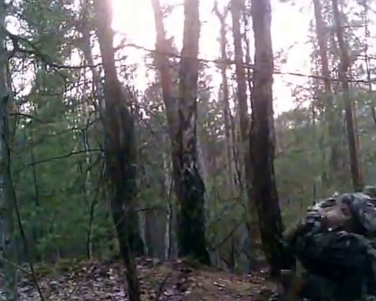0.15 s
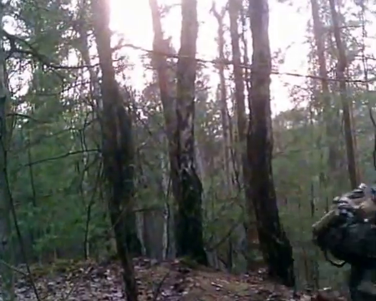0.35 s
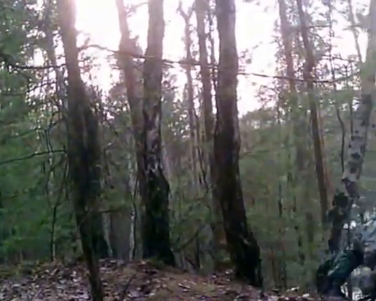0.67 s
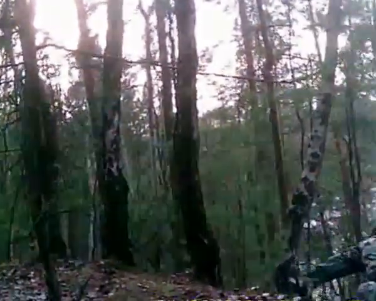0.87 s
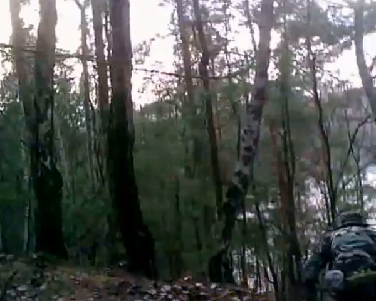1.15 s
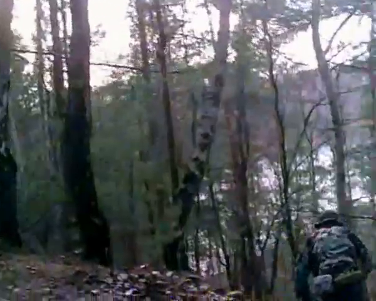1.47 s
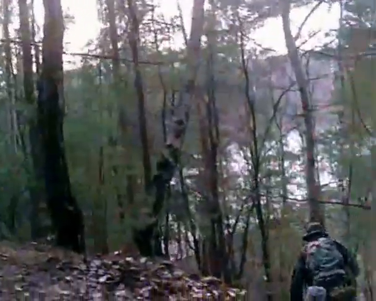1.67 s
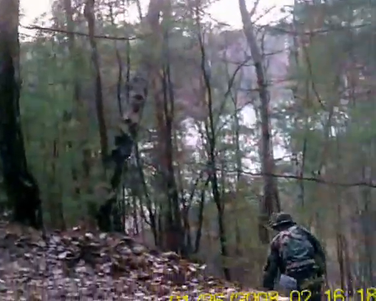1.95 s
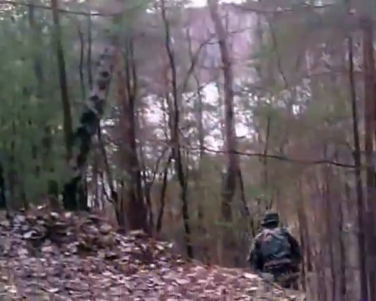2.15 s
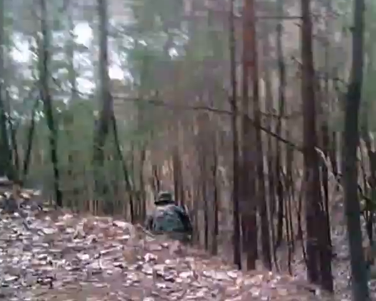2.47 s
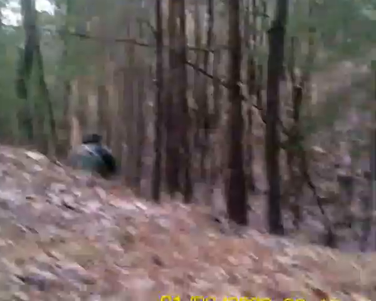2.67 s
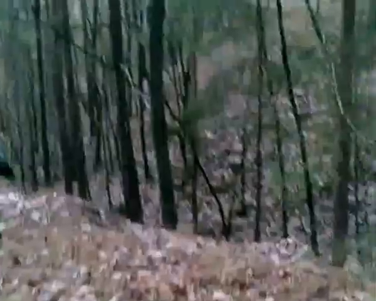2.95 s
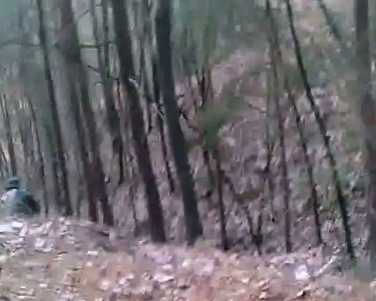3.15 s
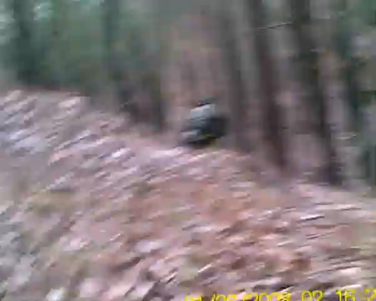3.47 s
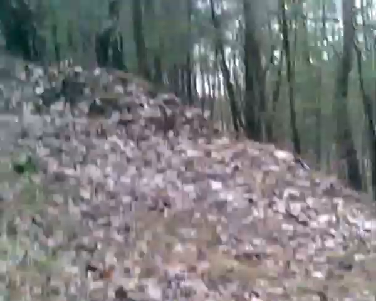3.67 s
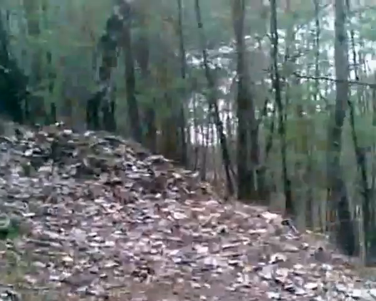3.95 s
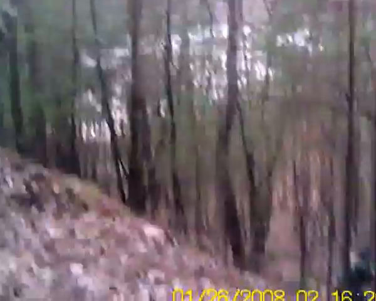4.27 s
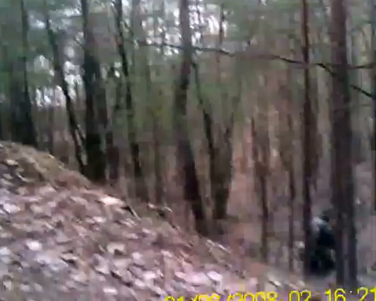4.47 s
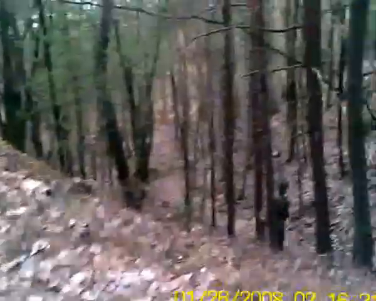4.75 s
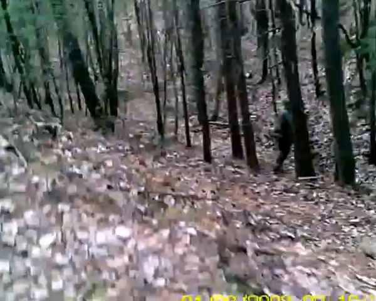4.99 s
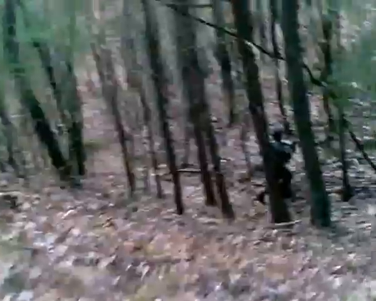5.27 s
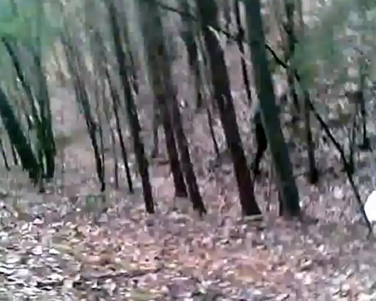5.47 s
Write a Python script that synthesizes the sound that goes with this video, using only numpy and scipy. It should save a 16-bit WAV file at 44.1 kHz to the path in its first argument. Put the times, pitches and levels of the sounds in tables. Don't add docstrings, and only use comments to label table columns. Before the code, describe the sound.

Outdoors among dry fallen leaves, a handful of faint rustling steps from others fade in the first second and a half, under rumbling wind and cloth friction. A buckle clicks near the microphone. Then the wearer sets off, crushing leaves irregularly, snapping twigs and stiff leaves, while gear thumps the camera case and wind gusts swell. Close, rough mono pickup with hiss, faint electronic whine and a hollow colouring.

```python
import sys
import numpy as np
from scipy import signal
from scipy.fft import rfft, irfft
from scipy.io import wavfile
from scipy.ndimage import uniform_filter1d

SR = 44100
rng = np.random.default_rng(int(sys.argv[2]) if len(sys.argv) > 2 else 0)


def volts(x):
    e = np.asarray(x, float) / 20
    return 10 ** e


def output_pcm(signal):
    pcm = np.clip(np.atleast_2d(signal).T, -1, 1) * 32767
    wavfile.write(sys.argv[1], SR, np.round(pcm).astype(np.int16))


N = 247842
T = np.arange(N) / SR

# start_s, buffet_level_db (slow pushes), flutter_level_db (quick ones)
WIND = [(0, -33, -41), (.25, -39, -42.5), (.9, -32, -40.5), (1.1, -35.5, -44), (1.5, -32, -43.5),
        (1.9, -35.5, -48), (2.24, -22.5, -35.5), (2.46, -28, -42.5), (2.83, -22, -41.5), (3.61, -27.5, -48),
        (3.72, -23.5, -35.5), (3.95, -28.5, -39.5), (4.22, -21.5, -37.5), (4.3, -32.5, -31),
        (4.37, -24, -26), (4.62, -22, -22.5), (5.24, -28, -44.5), (5.62, -29.5, -32)]
# pitch_hz, level_db
BUFFET_COLOUR = [(1, 8), (3, 5), (8, 11.5), (16, 3), (30, 6), (45, -0.5), (70, -27.5), (120, -44)]
# pitch_hz, level_db
FLUTTER_COLOUR = [(25, -60), (45, -3), (65, -1.5), (90, -5), (130, -10), (180, -21.5), (300, -29.5),
                  (600, -56)]
# start_s, length_s, level_db
PUFFS = [(2.05, 0.089, -43), (2.17, 0.12, -32), (2.64, 0.061, -41.5), (2.82, 0.086, -48),
         (3.02, 0.051, -29.5), (3.46, 0.043, -32.5), (3.68, 0.054, -33.5), (3.8, 0.078, -30),
         (4.22, 0.057, -30), (4.33, 0.034, -23), (4.77, 0.034, -25), (5.1, 0.037, -41)]

# start_s, length_s, level_db
RUBS = [(.2, 0.18, -47.5), (.6, 0.17, -45.5), (.89, 0.068, -49.5), (1.08, 0.55, -46), (1.62, 0.48, -48.5),
        (2.04, 0.42, -45), (2.36, 0.35, -41), (2.75, 0.21, -42), (3.15, 0.12, -45.5), (3.27, 0.098, -41),
        (3.41, 0.099, -39.5), (3.47, 0.2, -46), (3.8, 0.17, -44.5), (3.98, 0.083, -41), (4.12, 0.35, -45),
        (4.64, 1, -43.5), (5.08, 0.13, -38.5), (5.34, 0.051, -61), (5.54, 0.15, -42)]
# pitch_hz, level_db
RUB_COLOUR = [(100, 0), (180, 0), (300, -1), (450, -1), (650, -9.5), (850, -17.5), (1050, -23.5),
              (1400, -52)]

# start_s, level_db
LITTER = [
    (0, -63.5),
    (2.2, -60),
    (2.5, -55),
    (4.4, -58.5),
    (5.62, -58.5),
]
# start_s, length_s, level_db, body_db, brightness_db
SHUFFLES = [(.0, 0.046, -61, -7, -2), (1.117, 0.5, -55.5, 7, -14), (1.6, 0.24, -57.5, 6, -5),
            (1.947, 0.36, -54.5, 6.5, -6), (2.86, 0.15, -40.5, -1.5, -6), (3.402, 0.2, -47, 3.5, -7.5),
            (3.787, 0.33, -47.5, 3.5, -2), (4.023, 0.28, -51.5, 8, 2), (4.574, 0.21, -52, 8, -2),
            (4.8, 0.19, -50, 10, -6.5), (5.51, 0.088, -48, 1, -2)]
# start_s, length_s, level_db, body_db, brightness_db
FAR_STEPS = [
    (0.158, 0.25, -53, -0.5, 0),
    (0.53, 0.29, -50, -4, -0.5),
    (0.892, .08, -55.5, -14, -6),
    (1.102, 0.11, -62, 0, -7),
    (1.36, 0.38, -55, 2, 0.5),
]
# start_s, length_s, level_db, body_db, brightness_db
STEPS = [(2.346, .3, -42, 2, -4.5), (2.56, .14, -52, 6, 0.5), (2.794, 0.064, -49.5, -6, -10),
         (3.11, 0.085, -50, -5, -6.5), (3.265, 0.036, -50.5, 3.5, -8.5), (3.38, 0.088, -54.5, 6.5, -5),
         (3.655, 0.1, -56, 7, -3), (3.757, 0.14, -49, 1.5, -5.5), (4.258, .15, -57.5, 4, 0.5),
         (4.476, 0.089, -51.5, -8, -3.5), (4.794, 0.074, -48, 4, -7), (4.96, 0.13, -45.5, 8, -0.5),
         (5.083, 0.16, -45, 7.5, -3), (5.356, 0.055, -52, 1, -5.5), (5.445, 0.028, -51, 1.5, -2)]

# start_s, peak_db, body_db
TWIGS = [(0.3334, -41.5, 5.5), (0.3723, -46, 7), (.917, -38.5, -12), (1.534, -56, -15), (2.377, -38, 0),
         (2.394, -35, -7), (2.4957, -35, -1), (2.8943, -38, 2.5), (3.1453, -31.5, -14), (3.247, -34, -6),
         (3.2774, -47, -10), (3.3353, -38.5, 2), (3.4634, -52, -21), (3.6019, -38, 1), (3.7893, -35, -13),
         (3.9251, -31, -2), (3.935, -38, -16), (3.9656, -32, -13), (3.9933, -33, -6), (4.013, -34.5, -2),
         (4.091, -28, -13), (4.4929, -30, -8.5), (4.751, -37.5, -5), (4.8095, -30, -6),
         (4.9414, -44.5, 11.5), (4.9743, -40, 10), (5.461, -35, -15), (5.477, -33, -20)]
# start_s, peak_db, body_db
CRISP = [(.173, -43, -21), (0.6354, -40, -12), (1.393, -43, -1), (2.5894, -34.5, -1), (2.709, -39, -7),
         (3.375, -35.5, -18), (3.4011, -30.5, -4), (3.6605, -36, 0), (3.691, -32.5, -6), (3.7256, -37, -17),
         (3.8167, -48, -10), (4.1257, -32.5, -8), (4.3818, -37, -7), (4.4227, -33.5, -4.5),
         (4.6335, -33, -28), (4.8756, -33.5, .4), (5.007, -39.5, 13.5), (5.1461, -28, -4),
         (5.1699, -28.5, 3), (5.3755, -45, -1), (5.384, -30, -4), (5.5493, -36.5, 3.5), (5.591, -36, -9)]
# start_s, peak_db, body_db
TEARS = [
    (0.544, -43.5, -3),
    (2.2474, -54, 11),
    (2.862, -39, -8),
    (3.429, -37.5, -7),
    (4.153, -47, 13.5),
    (4.1756, -37.5, 2),
    (5.1135, -32.5, -9),
    (5.1305, -26.5, -2),
    (5.1393, -36, -8),
]
# treble_db, length_ms
SNAP_KINDS = [
    (-16, .9),
    (-11, .9),
    (-7.5, 1.3),
]
SNAP_GAIN_DB = (37, 27, 32)

# start_s, peak_db, pitch_hz, decay_s
KNOCKS = [(0.238, -26.5, 167, 0.046), (0.374, -22, 172, 0.024), (0.743, -39, 161, 0.034),
          (0.901, -28.5, 188, 0.07), (1.443, -28, 285, 0.068), (2.059, -27, 263, 0.067),
          (2.613, -48, 390, 0.02), (3.302, -24, 362, 0.05), (3.331, -15.5, 180, 0.016),
          (3.43, -30, 365, 0.061), (3.995, -36, 223, 0.021), (4.674, -16, 165, 0.036),
          (4.914, -19, 158, 0.055), (5.127, -16, 158, 0.024), (5.377, -24, 162, 0.043),
          (.76, -28, 402, 0.033), (.385, -33, 430, 0.027), (2.245, -31, 600, .03),
          (3.68, -29.5, 560, 0.028), (5.131, -19, 614, 0.026), (5.17, -41, 420, 0.02)]
# start_s, swell_s, pitch_hz, peak_db
HOLLOW = (1.577, .012, 440, -30)
# start_s, peak_db, low_ring_db
BUCKLE = [
    (1.5761, -29.5, 0),
    (1.9745, -34, -14),
    (1.1176, -39, -3),
]
# pitch_hz, decay_s
BUCKLE_MODES = [(2200, .014), (2800, .007), (3450, .008)]

# pitch_hz, level_db
CASE_SLOPE = [(300, -17), (800, -7), (1300, -11.5), (2000, -9.5), (4200, -9), (5000, -11), (7000, -15.5),
              (11000, -21)]
# pitch_hz, width_hz, level_db
CASE_PEAKS = [(977, 264, -24.5), (1519, 390, 11.5), (2950, 380, -6.5), (3360, 640, 5.5), (4745, 530, -5),
              (6170, 310, 8), (7670, 1090, 14), (8380, 360, -11.5), (9130, 1000, 11), (10900, 520, -21)]
# pitch_hz, level_db
WHINE = [(3894, -81), (6745, -86), (9600, -80), (10638, -89)]


def unit(x):
    return x / np.sqrt(np.mean(x ** 2))


def even(x):
    return x / np.sqrt(uniform_filter1d(x ** 2, SR // 8) + 1e-9)


def curves(table):
    s, *columns = np.transpose(table)
    return [np.interp(T, s, column) for column in columns]


def slope(points, hz):
    f, db = np.transpose(points)
    return np.interp(np.log(hz + 0.14), np.log(f), db)


def coloured(points):
    hz = np.arange(N // 2 + 1) * SR / N
    gain = volts(slope(points, hz)) * (hz < points[-1][0])
    return unit(irfft(rfft(rng.standard_normal(N)) * gain, N))


def walk(rate_hz):
    k = int(SR / rate_hz)
    held = np.repeat(rng.standard_normal(N // 100), k)[:N]
    return unit(uniform_filter1d(uniform_filter1d(held, k), k))


def strokes(table, rise, sag_db_s, fade_db_s):
    s, length, db = np.transpose(table)[:3, :, None]
    t = T[::64] - s
    swell = np.sin(np.pi / 2 * np.clip(t / (rise * length), 0, 1)) ** 2
    level_db = db - sag_db_s * t - fade_db_s * np.maximum(t - length, 0)
    return (swell * volts(level_db)) ** 2


def spread(x):
    return np.interp(T, T[::64], x)


def add(track, s, sound):
    i = int(s * SR)
    track[i:i + len(sound)] += sound[:N - i]


def registers(x):
    hz = np.arange(N // 2 + 1) * SR / N
    above_body = 1 / (1 + (2000 / (hz + 1)) ** 8)
    above_middle = 1 / (1 + (4800 / (hz + 1)) ** 12)
    shares = np.array([1 - above_body, above_body - above_middle, above_middle])
    return irfft(rfft(x) * shares, N)


def case(x):
    hz = np.arange(1025) * SR / 2048
    db = slope(CASE_SLOPE, hz)
    for f, width, gain in CASE_PEAKS:
        db = db + gain / (1 + (2 * (hz - f) / width) ** 2)
    cepstrum = irfft(db * np.log(10) / 20)
    cepstrum[1:1024] *= 2
    cepstrum[1025:] = 0
    ringing = irfft(np.exp(rfft(cepstrum)))[:1024]
    return signal.fftconvolve(x, ringing)[:N]


def wind():
    buffet_db, flutter_db = curves(WIND)
    puffs = spread(strokes(PUFFS, rise=1, sag_db_s=15, fade_db_s=202).sum(axis=0))
    slow = even(coloured(BUFFET_COLOUR))
    quick = even(coloured(FLUTTER_COLOUR))
    buffet = volts(buffet_db) * unit(np.tanh(0.5 * slow))
    flutter = np.sqrt(volts(2 * (flutter_db - 1.5)) + puffs) * volts(2.6 * walk(25))
    return buffet + flutter * quick


def rub():
    rest_db = -48.5
    power = strokes(RUBS, rise=0.22, sag_db_s=3, fade_db_s=139).sum(axis=0) + volts(2 * rest_db)
    jerks = volts(0.7 * walk(30.32) + 2.15 * walk(90))
    return spread(np.sqrt(power)) * unit(even(coloured(RUB_COLOUR)) * jerks)


def litter():
    body_db, bright_db = np.transpose(np.vstack([FAR_STEPS, STEPS, SHUFFLES]))[3:]
    steps = strokes(STEPS, rise=0.34, sag_db_s=18, fade_db_s=137)
    shuffles = strokes(SHUFFLES, rise=0.73, sag_db_s=14.5, fade_db_s=198)
    bed_db, = curves(LITTER)
    out = []
    parts = ((body_db, 4.5, 0), (0 * body_db, 0, 0), (bright_db, -2.5, 30))
    for db, rest_db, dulls_db_s in parts:
        far = strokes(FAR_STEPS, rise=0.16, sag_db_s=19.5 + dulls_db_s, fade_db_s=60)
        moving = spread(volts(2 * db) @ np.vstack([far, steps, shuffles]))
        out.append(np.sqrt(moving + volts(2 * (bed_db + rest_db))))
    return out


def breaks(per_s, spread_db, fade_samples, length):
    chance = rng.random((2, N))
    ticks = (chance[0] < per_s / SR) * volts(-spread_db * np.log(chance[1]))
    fade = np.exp(-np.arange(length) / fade_samples)
    return even(signal.fftconvolve(ticks, fade)[:N] * rng.standard_normal(N))


def leaves():
    low, mid, high = litter()
    grains = breaks(per_s=2500, spread_db=2, fade_samples=75, length=200)
    crackle = breaks(per_s=220, spread_db=3, fade_samples=29, length=300)
    rustle = rng.standard_normal(N)
    clusters = volts(0.53 * walk(40) + 0.8 * walk(14))
    crush = case((0.73 * grains + 0.6 * rustle + volts(-8) * crackle) * clusters)
    body, crisp, treble = (unit(row) for row in registers(crush))
    return low * body * volts(0.18 * walk(25.3)) + mid * crisp + high * treble * volts(walk(30.01))


def snaps():
    out, t = np.zeros((3, N)), np.arange(600) / SR
    crack = 1.0 * (t == 0)
    for table, (treble_db, ms) in zip((TWIGS, CRISP, TEARS), SNAP_KINDS):
        for s, db, body_db in table:
            splinters = rng.standard_normal(600) * np.exp(-t * 1000 / (2.5 * ms))
            body = crack + 0.055 * splinters
            middle = crack + 0.11 * splinters
            treble = 0.08 * crack + 0.16 * splinters
            for track, layer, share_db in zip(out, (body, middle, treble), (body_db, 0, treble_db)):
                add(track, s + 0.0006, layer * volts(db + share_db))
    return case(volts(SNAP_GAIN_DB) @ registers(out))


def knocks():
    out, t = np.zeros(N), np.arange(4000) / SR
    for s, db, hz, decay_s in KNOCKS:
        onset = 1 - np.exp(-t / 0.0029)
        thud = np.sin(2 * np.pi * hz * t) * 1000 ** (-t / decay_s) * onset
        add(out, s, -volts(db + 1.0) * thud)
    s, swell_s, hz, db = HOLLOW
    shape = (t / swell_s * np.exp(1 - t / swell_s)) ** 2
    add(out, s, volts(db) * shape * np.sin(2 * np.pi * hz * t * (1 + 2.8 * t)))
    return out


def buckle():
    out, t = np.zeros(N), np.arange(800) / SR
    low, *high = (np.sin(2 * np.pi * hz * t) * 1000 ** (-t / decay_s) for hz, decay_s in BUCKLE_MODES)
    for s, db, low_db in BUCKLE:
        add(out, s, volts(db) * (volts(low_db) * low + 0.5 * sum(high)))
    return out


def scene():
    return (wind() + rub() + leaves() + snaps() + knocks() + buckle())[None]


def roll_off(x):
    return signal.sosfilt(signal.butter(12, 16530, fs=SR, output="sos"), x)


def record(dry):
    hiss_db, offset, converter_hz, top_hz = -58, -0.011, 10900, 15730
    hiss = volts(hiss_db) * rng.standard_normal(dry.shape)
    whine = sum(volts(db) * np.sqrt(2) * np.sin(2 * np.pi * hz * T) for hz, db in WHINE)
    converter = signal.ellip(8, 0.2, 60, converter_hz, fs=SR, output="sos")
    slow = signal.sosfilt(converter, dry + hiss + whine)
    held = np.repeat(slow[:, ::2], 2, axis=1)[:, :N]
    top = signal.ellip(12, 0.2, 80, top_hz, fs=SR, output="sos")
    cut = signal.sosfilt(top, held)
    stop = np.clip((T[-1] - T) / 0.004, 0, 1)
    return roll_off((cut + offset) * stop)


dry = scene()
out = record(dry)
output_pcm(out)
```